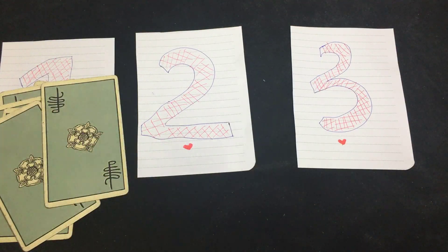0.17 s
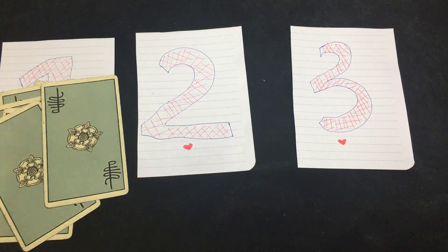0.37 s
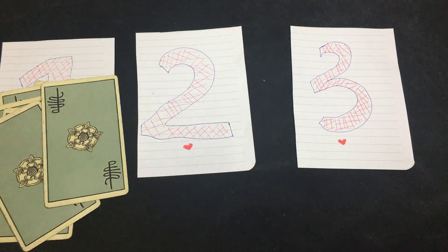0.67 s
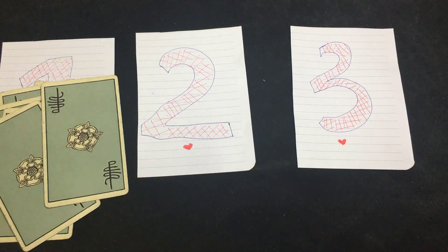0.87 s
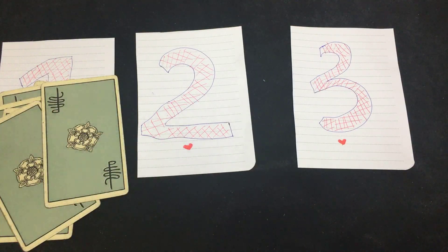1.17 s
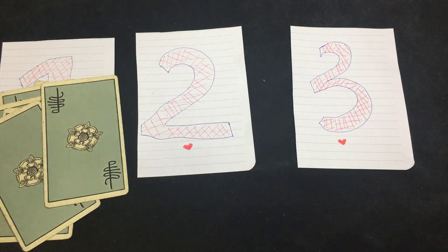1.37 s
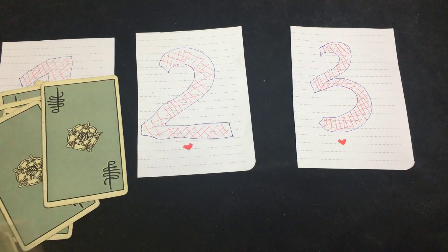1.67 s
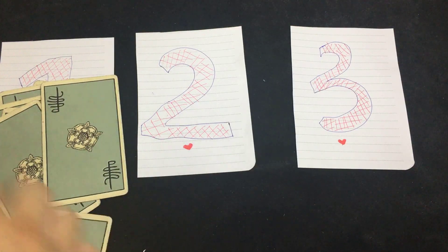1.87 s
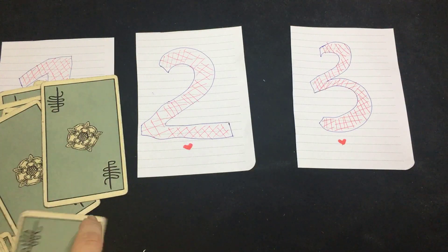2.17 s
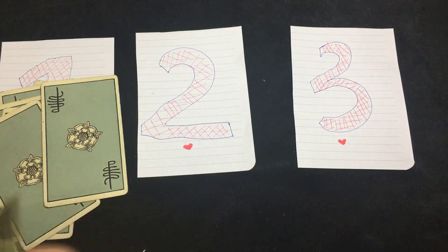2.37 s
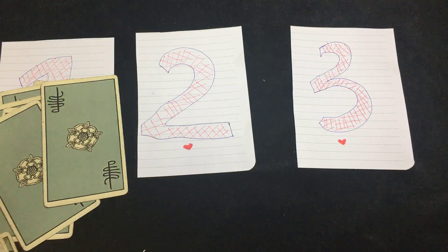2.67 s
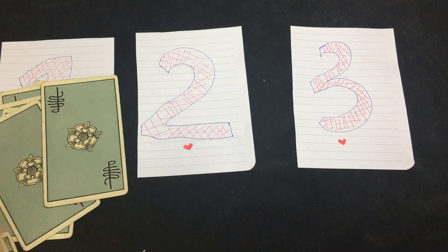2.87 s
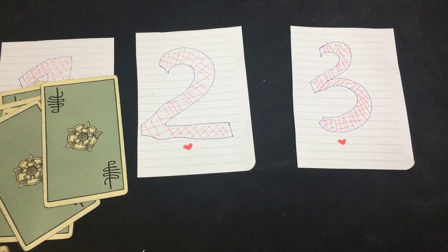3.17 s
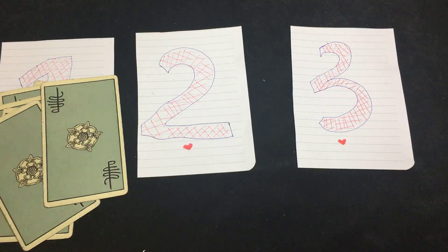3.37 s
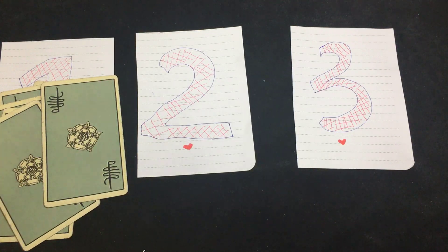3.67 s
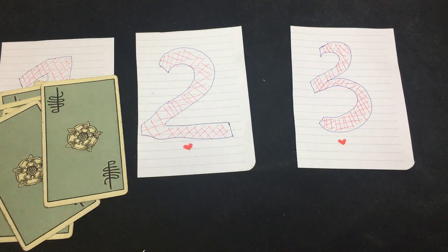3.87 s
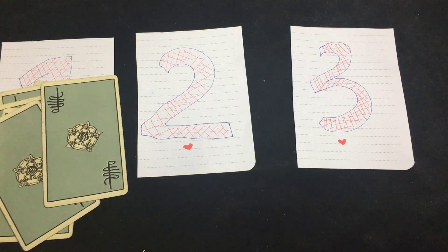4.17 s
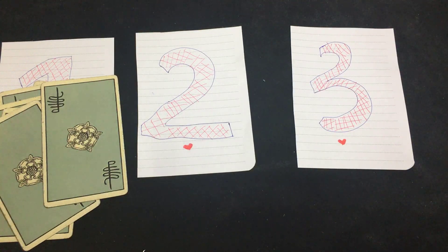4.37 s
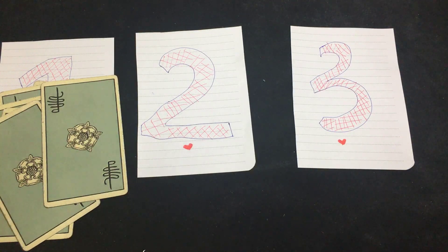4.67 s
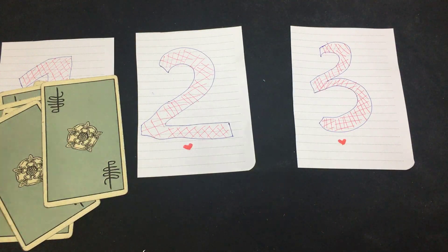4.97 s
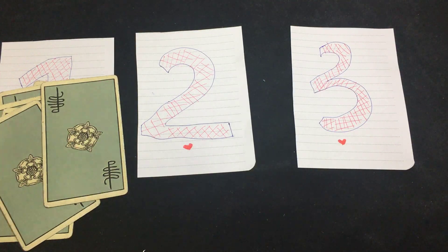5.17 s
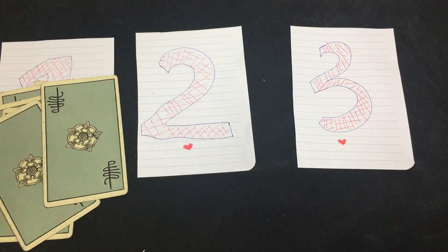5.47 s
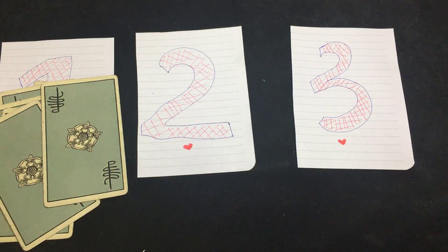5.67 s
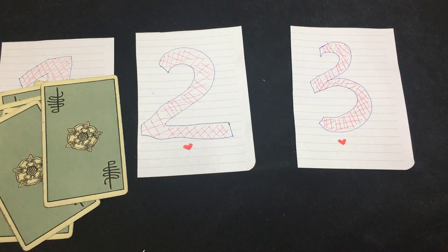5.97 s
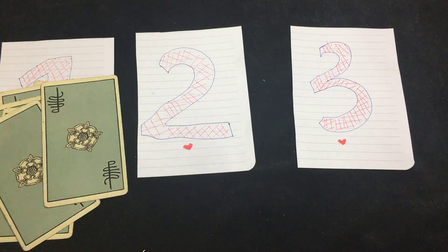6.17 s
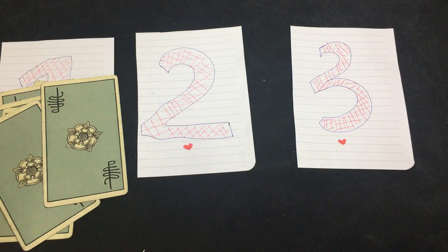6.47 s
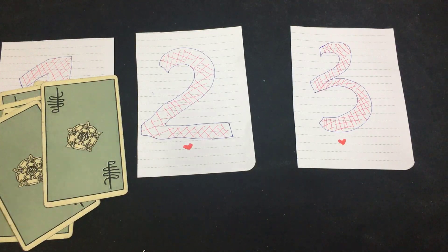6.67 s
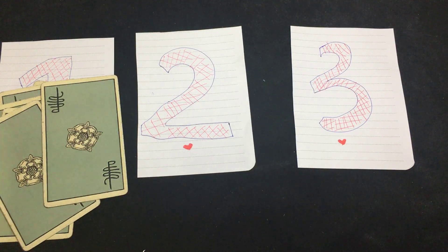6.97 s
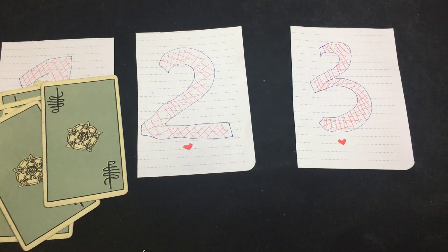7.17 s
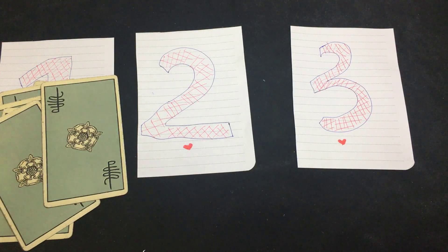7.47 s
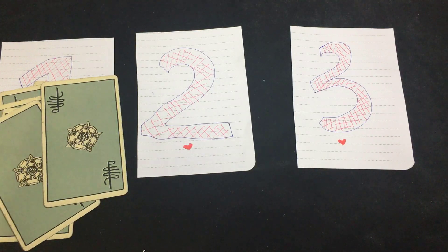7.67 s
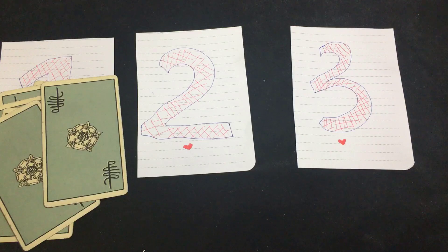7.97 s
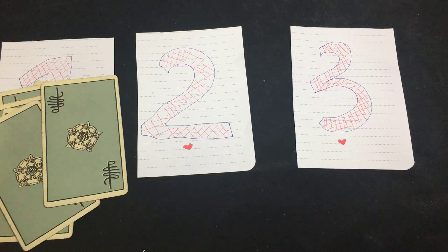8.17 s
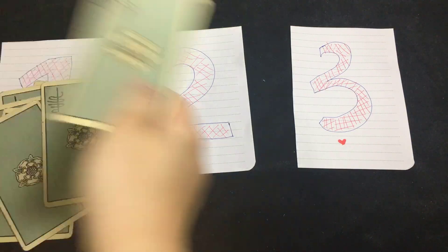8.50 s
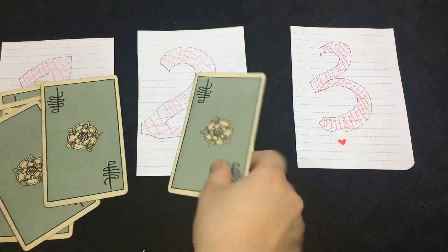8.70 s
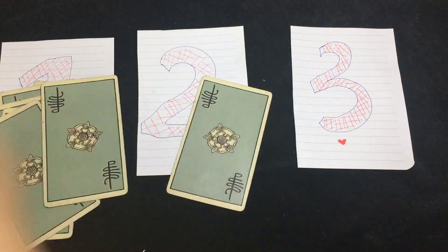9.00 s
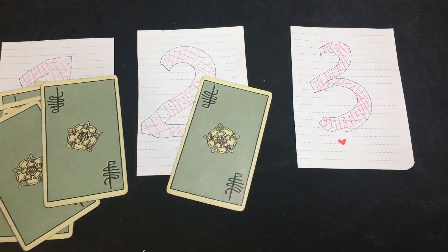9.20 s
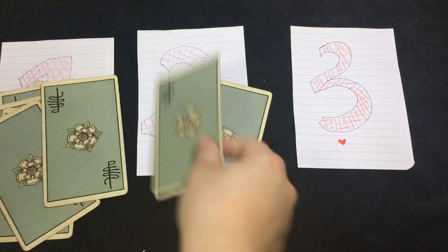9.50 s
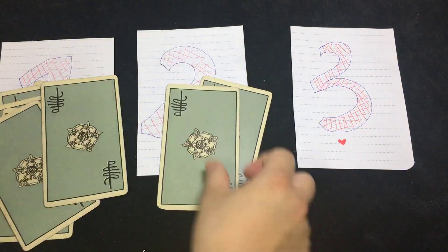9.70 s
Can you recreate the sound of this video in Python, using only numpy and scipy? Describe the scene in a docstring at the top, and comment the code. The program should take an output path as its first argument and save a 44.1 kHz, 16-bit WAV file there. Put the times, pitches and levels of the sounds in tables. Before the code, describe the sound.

Close-up card handling: sharp snaps, light flicks and papery slides, with heavy knocks on a tabletop around the middle, over low room rumble.

```python
"""Stiff cards snap, thud, tick and hiss as they are shuffled, knocked square and dealt on a table, close to
a microphone in a small bare room; a tail of about half a second follows, over steady rumble and hiss.
Contacts are short noise rattles through resonances of trapped air, card and edge, plus decaying table modes.
Sliding is grainy noise under bell-shaped strokes; the room is a decaying noise response with bass modes."""
import sys
import numpy as np
from scipy import signal
from scipy.fft import rfft, irfft
from scipy.io import wavfile

SR = 44100
rng = np.random.default_rng(int(sys.argv[2]) if len(sys.argv) > 2 else 0)


def transcribe(signal):
    """Save signal, clipped to [-1, 1], as a 16-bit WAV file at the path in sys.argv[1]."""
    frames = np.atleast_2d(signal).T
    limited = np.clip(frames, -1, 1)
    pcm = np.round(limited * 32767).astype(np.int16)
    wavfile.write(sys.argv[1], SR, pcm)


N = 433944
CONTACT_N = 4000   # samples per contact


def from_db(db):
    """Decibels to gain."""
    return 10 ** (np.asarray(db) / 20)


def rms_one(x):
    """Scale each row to unit rms."""
    return x / np.sqrt(np.mean(x ** 2, axis=-1, keepdims=True) + 1e-20)


def peak_one(x):
    """Scale to unit peak."""
    return x / np.max(np.abs(x))


def at_hz(points, hz, column=1):
    """Read one column of a table on a log-frequency axis."""
    points = np.array(points)
    return np.interp(np.log(hz), np.log(points[:, 0]), points[:, column])


def coloured(x, spectrum):
    """Give a noise the spectrum of a table; rms 1."""
    hz = np.fft.rfftfreq(len(x), 1 / SR) + 1   # +1 avoids log(0)
    return rms_one(irfft(rfft(x) * from_db(at_hz(spectrum, hz)), len(x)))


def drift(rate_hz):
    """Slow random curve, spread 1: noise through a double pole at rate_hz."""
    step = 40   # samples per drift point
    r = np.exp(-2 * np.pi * rate_hz * step / SR)
    noise = rng.standard_normal(N // step + 2002)
    slow = signal.lfilter([1], [1, -2 * r, r * r], noise)[2000:]   # settled part
    return np.interp(np.arange(N) / step, np.arange(len(slow)), rms_one(slow))


def resonate(x, hz, width_hz):
    """One resonance with unit gain on top."""
    r = np.exp(-np.pi * width_hz / SR)
    numerator = [(1 - r * r) / 2, 0, (r * r - 1) / 2]
    return signal.lfilter(numerator, [1, -2 * r * np.cos(2 * np.pi * hz / SR), r * r], x)


def band_filter(x, order, hz, kind):
    """Butterworth filter."""
    return signal.sosfilt(signal.butter(order, hz, kind, fs=SR, output="sos"), x)


def contact_drive(contact_ms):
    """Card rattling on a surface: row 0 the near rattle, row 1 the even spectrum of one click.
    Summed over all directions, as the walls get it, the rattle has that even spectrum."""
    t = np.arange(CONTACT_N) / SR
    envelope = (1 - np.exp(-t / 0.00042)) * np.exp(-t * 1000 / contact_ms)
    rattle = rng.standard_normal(CONTACT_N) * envelope
    click = 1.0 * (t == 0)
    return np.array([rattle, click])


def air_slap(drive, hz):
    """Air trapped under a flat card: broad resonances around one pitch."""
    low = resonate(drive, 0.54 * hz, 0.71 * hz)
    high = resonate(drive, 1.24 * hz, 0.47 * hz)
    fixed = resonate(drive, 2120, 1230)
    return resonate(low - 1.29 * high + 0.26 * fixed, hz, 1.75 * hz)


def card_flex(drive, hz):
    """The bending card rings briefly; its body radiates little above 3 kHz."""
    body = resonate(drive, hz, 0.79 * hz) + 0.28 * resonate(drive, 1300, 1400)
    return band_filter(resonate(body, hz, 0.48 * hz), 3, 3000, "low")


def edge_crack(drive, hz, splash):
    """The card edge cracks at a pitch; splash is the share of broad noise beside it."""
    pitched = resonate(resonate(drive, hz, 0.24 * hz), hz, 0.5 * hz)
    return band_filter(pitched + splash * resonate(drive, 4000, 6800), 2, 2900, "high")


def table_thud(thud_db):
    """Heavy table top starts late and softly, rings a few cycles; light landings favour upper modes."""
    # table-top modes: f/Hz, relative level/dB before tilt and chance, t60/s
    table_modes = [(130, -17, 0.011), (150, -36.5, 0.035), (211, -8.5, 0.017), (246.6, 9, 0.025),
                   (309, -10.5, 0.087), (353, -13.5, 0.03), (464, -20.5, 0.0098), (600, -30, 0.0149)]
    tilt_per_db, pivot_hz, spread_db = 0.5, 230, 1.5   # tilt: dB/octave per dB below full strength
    late = np.maximum(np.arange(CONTACT_N) / SR - 0.003, 0)
    thud = np.zeros(CONTACT_N)
    for hz, db, t60_s in table_modes:
        tilt_db = -tilt_per_db * thud_db * np.log2(hz / pivot_hz)
        gain = from_db(db + rng.normal(0, spread_db) + tilt_db)
        thud += gain * np.sin(2 * np.pi * hz * late) * from_db(-60 * late / t60_s)
    return peak_one(thud * (1 - np.exp(-late / 0.0018)))


def all_contacts():
    """Rows of (slap Hz, s, slap dB, thud dB, flex dB, flex Hz, crack dB, crack Hz, contact ms, splash)."""
    # cards or pack landing, a few (3.382, 3.855, 8.464 s) a finger knocking the table: t/s, slap rms/dB, thud
    # peak/dB, flex rms/dB, flex f/Hz, crack rms/dB, slap f/Hz
    landings = [(0.131, -29.5, -10.5, -30, 2530, -32, 905), (1.484, -43.5, -29, -62, 2080, -47, 810),
                (1.514, -34.5, -22.5, -26, 1550, -27.5, 1060), (1.674, -36, -20, -41, 2740, -45, 744),
                (1.682, -41, -29, -45.5, 1880, -40, 750), (1.772, -36.5, -27, -47.5, 1500, -55, 1080),
                (2.752, -39, -30, -39, 1480, -50, 1000), (2.759, -37, -26.5, -41, 1810, -39.5, 600),
                (3.382, -53, -28, -62, 2220, -58, 810), (3.753, -51.5, -34.5, -46.5, 1930, -49.5, 910),
                (3.855, -55, -25.5, -56, 1980, -46, 800), (5.155, -26.5, -11.5, -21.5, 2220, -28.5, 1040),
                (5.639, -19.5, -3.5, -21.5, 1770, -30, 1020), (6.867, -26, -8, -41.5, 2090, -41.5, 750),
                (7.301, -44.5, -26, -49, 2640, -46, 910), (7.45, -59.5, -37.5, -60.5, 2550, -56.5, 900),
                (8.158, -61, -51, -64.5, 1670, -60, 896), (8.464, -46, -19.5, -47, 1310, -51, 546),
                (8.51, -56, -36, -63, 1500, -64, 550), (8.716, -51.5, -36.5, -47.5, 1580, -45, 696),
                (9.134, -59, -39.5, -63, 1610, -60.5, 795)]
    # edges catching and flicking on each other: t/s, flex rms/dB, crack rms/dB, crack f/Hz
    ticks = [(0.789, -84, -53.5, 9200), (1.136, -57, -56, 9300), (1.764, -46, -55.5, 3500),
             (1.783, -55, -60, 6150), (1.812, -51, -53.5, 5760), (1.866, -51.5, -62, 3920),
             (1.903, -51.5, -54, 3940), (1.955, -56, -70, 4630), (2.226, -59.5, -59, 8000),
             (2.468, -54, -58.5, 4150), (2.8, -70, -52, 3650), (2.896, -69, -56, 4200),
             (2.904, -50, -49.5, 3980), (3.205, -57, -59.5, 3780), (3.716, -52, -49, 9100),
             (4.089, -55, -57, 9000), (4.929, -60, -72, 3560), (5.051, -61, -60.5, 4730),
             (5.094, -65, -60.5, 4460), (5.514, -50.5, -55.5, 3760), (5.529, -66, -55, 4200),
             (6.166, -80, -61.5, 9330), (6.548, -77, -47.5, 9000), (6.736, -58.5, -66, 5950),
             (8.576, -53.5, -65, 4490), (8.735, -46.5, -47, 4300), (9.357, -46, -48, 3700),
             (9.602, -50.5, -46.5, 4260), (9.634, -49.5, -49.5, 4020), (9.697, -47.5, -48, 4670),
             (9.707, -48.5, -53, 3640), (9.736, -53, -51.5, 5840)]
    # card corner springing off the thumb in three thin, bright bursts: t/s, flex rms/dB, crack rms/dB, crack f/Hz
    flicks = [(2.628, -55, -29.5, 6050), (2.634, -49, -38, 6060), (2.640, -48, -35.5, 4900)]
    crack_to_flex = 2.06   # pitch ratio
    landing_ms, tick_ms, flick_ms = 1.8, 2, 6.4
    landing_splash, tick_splash, flick_splash = 0.9, 0.43, 0.2
    light_slap_hz, light_flex_hz = 957, 1743   # ticks and flicks; flex is the centre of its spread
    slap_re_flex_db, thud_re_flex_db = -4.5, 7.5
    faint_count, faint_crack_db, faint_crack_hz = 60, -75, 6200   # centres of the spread

    rows = []
    for s, slap_db, thud_db, flex_db, flex_hz, crack_db, slap_hz in landings:
        rows.append((slap_hz, s, slap_db, thud_db, flex_db, flex_hz,
                     crack_db, crack_to_flex * flex_hz, landing_ms, landing_splash))

    faint = []   # very faint, short, high ticks at random times
    for s in rng.random(faint_count) * N / SR:
        a, b, c = rng.standard_normal(3)
        faint.append((s, faint_crack_db - 11 + 4 * a, faint_crack_db + 4 * b, faint_crack_hz * 1.175 ** c))

    for events, contact_ms, splash in [(ticks + faint, tick_ms, tick_splash), (flicks, flick_ms, flick_splash)]:
        for s, flex_db, crack_db, crack_hz in events:
            flex_hz = light_flex_hz * 1.28 ** rng.standard_normal()
            rows.append((light_slap_hz, s, flex_db + slap_re_flex_db, flex_db + thud_re_flex_db,
                         flex_db, flex_hz, crack_db, crack_hz, contact_ms, splash))
    return rows


def contacts():
    """Each rattle drives trapped air, card and edge; the table thuds with the slap.
    Returns parts (slap and thud, flex, crack) x (near, to walls) x samples."""
    out = np.zeros((3, 2, N + CONTACT_N))
    for slap_hz, s, slap_db, thud_db, flex_db, flex_hz, crack_db, crack_hz, contact_ms, splash in all_contacts():
        drive = contact_drive(contact_ms)
        slap = from_db(slap_db) * rms_one(air_slap(drive, slap_hz))
        thud = from_db(thud_db) * table_thud(thud_db)
        flex = from_db(flex_db) * rms_one(card_flex(drive, flex_hz))
        crack = from_db(crack_db) * rms_one(edge_crack(drive, crack_hz, splash))
        at = round(s * SR)
        out[..., at:at + CONTACT_N] += [slap - thud, flex, crack]
    return out[..., :N]


def slides():
    """Dense friction grains between two faces: bright hiss and duller scrape from the flexing card."""
    # friction hiss spectrum: f/Hz, relative level/dB per Hz
    hiss_spectrum = [(410, -76), (700, -24.5), (984, -8), (1300, -14.5), (2220, -3), (6480, 0.5),
                     (14800, -4), (16000, -17.5)]
    # cards and fingers rubbing: t/s of peak, rise half length (Gaussian sigma)/ms, hiss/dB, scrape/dB
    rubs = [(0.128, 4.2, -41, -33.5), (0.346, 13, -49, -50.5), (.68, 104, -60, -66), (1.06, 58, -52.5, -53),
            (1.144, 10, -46.5, -57), (1.225, 18, -51.5, -77), (1.34, 22, -57, -66), (1.42, 10, -51, -72),
            (1.483, 14.3, -40.5, -35), (2.3, 51, -58, -59), (2.425, 17.5, -53, -50.5),
            (2.622, 2.3, -43, -68), (2.787, 22, -41, -36.5), (3.3, 150, -60, -61.5), (3.337, 15, -81, -56),
            (3.527, 6.6, -75, -55), (3.568, 13, -59, -49.5), (3.775, 36, -51, -48), (3.83, 11, -57, -52),
            (4.095, 11, -47, -56), (4.44, 74, -58, -76), (4.555, 24, -55.5, -59), (4.841, 25, -36, -58),
            (5.31, 70.5, -47, -57), (5.896, 10.3, -44.5, -43), (6.29, 34, -53.5, -58.5),
            (6.492, 8.9, -49, -50), (6.568, 20.5, -36, -48), (6.858, 5.1, -60, -47),
            (7.232, 22, -48.5, -49), (7.316, 10.3, -39.5, -36), (7.505, 22, -54.5, -54.5),
            (7.59, 11, -58, -52), (7.69, 11, -59, -56), (7.78, 30, -56.5, -59), (8.351, 88, -54.5, -57.5),
            (8.456, 15.4, -47, -37.5), (8.68, 18, -56, -50.5), (8.78, 30, -54, -60),
            (8.821, 13.4, -52.5, -42.5), (9.18, 68, -58.5, -73), (9.31, 30, -54, -56),
            (9.35, 15.5, -46, -43.5), (9.366, 6.9, -44, -34), (9.66, 15, -55, -51), (9.73, 7.5, -52, -43)]
    fade_to_swell, reach_s = 0.94, 0.3   # strokes are cut at reach_s either side
    grain_db = 4 * np.minimum(rng.exponential(1, N), 4.5) + 3 * drift(150)
    grains = rng.standard_normal((2, N)) * from_db(grain_db)
    hiss = coloured(grains[0], hiss_spectrum)
    scrape = resonate(resonate(grains[1], 1000, 3600), 1700, 3500)
    scrape = rms_one(resonate(scrape, 1200, 3000))
    out, t = np.zeros(N), np.arange(N) / SR
    for s, half_ms, hiss_db, scrape_db in rubs:
        near = slice(max(round((s - reach_s) * SR), 0), round((s + reach_s) * SR))
        sigma_ms = np.where(t[near] < s, half_ms, fade_to_swell * half_ms)
        stroke = np.exp(-0.5 * ((t[near] - s) * 1000 / sigma_ms) ** 2)
        out[near] += stroke * (from_db(hiss_db) * hiss[near] + from_db(scrape_db) * scrape[near])
    return out


def room(x):
    """Echo tail: half-octave noise bands, each dying at its own rate, and standing waves in the bass."""
    # noise tail: f/Hz, t60/s, level/dB
    tail_bands = [(60, 0.96, -13), (168.4, 1, -5), (271, 0.4, -4.5), (424, 0.58, 1), (1013, 0.61, -6.5),
                  (2770, 0.59, -8), (7200, 0.42, -7.5), (14000, 0.35, -5)]
    # standing waves: f/Hz, level/dB, t60/s
    standing_waves = [(125.8, -60, 0.24), (190.5, -60.5, 0.47), (213, -65.5, 1), (242, -60, 0.25),
                      (294, -71, 0.68), (404, -65.5, 0.39)]
    t = np.arange(SR) / SR
    tail = np.zeros(SR)
    for hz, db, t60_s in standing_waves:
        tail += from_db(db - 60 * t / t60_s) * np.sin(2 * np.pi * hz * t)
    white = rng.standard_normal((2, SR))   # neighbouring bands use different noise
    edges_hz = 45 * 2 ** np.arange(0, 8.6, 0.5)
    for k, (low, high) in enumerate(zip(edges_hz, edges_hz[1:])):
        hz = np.sqrt(low * high)
        band = band_filter(white[k % 2], 2, [low, high], "band")
        decay = from_db(-60 * t / at_hz(tail_bands, hz))
        decay /= np.sqrt(np.sum(decay ** 2))
        tail += from_db(at_hz(tail_bands, hz, column=2)) * band * decay
    onset = np.clip((t - 0.003) / 0.00095, 0, 1)
    return signal.fftconvolve(x, tail * onset)[:N]


def air():
    """Steady rumble and hiss from shaped noise; part of the hiss comes and goes."""
    # background spectrum: f/Hz, relative level/dB per Hz
    air_spectrum = [(25, -28.5), (42, 6.5), (74, 1.5), (210, -9.5), (498, -22), (622, -18), (740, -26.5),
                    (1070, -23), (1410, -29), (1990, -28.5), (4850, -37.5), (6060, -34.5), (9450, -38),
                    (10400, -39.5), (15500, -37.5)]
    steady_db, hiss_re_steady_db = -46, -6.5
    steady = coloured(rng.standard_normal(N), air_spectrum)
    hiss = band_filter(coloured(rng.standard_normal(N), air_spectrum), 2, 1500, "high")
    waver = from_db(5 * drift(5))
    return from_db(steady_db) * (steady + from_db(hiss_re_steady_db) * waver * hiss)


def scene():
    """Cards, room and air; each part of a contact radiates its own way and meets other echoes."""
    parts, sliding = contacts(), slides()
    near = parts[:, 0].sum(axis=0) + sliding
    echoes = room(sliding) + sum(room(part) for part in parts[:, 1])
    return (near + echoes + air())[None]


def record(dry):
    """Cut deep bass, clip whatever exceeds full scale, then cut the top."""
    no_bass = band_filter(dry, 4, 38, "high")
    top_cut = signal.ellip(10, 0.5, 60, 15620, fs=SR, output="sos")   # ripple/dB, stopband/dB, f/Hz
    return signal.sosfilt(top_cut, np.clip(no_bass, -1, 1))


dry = scene()
out = record(dry)
transcribe(out)
```